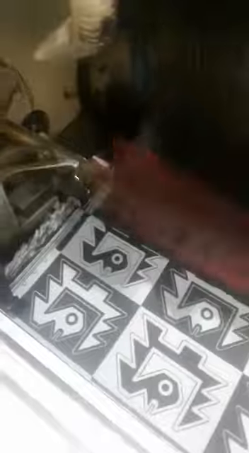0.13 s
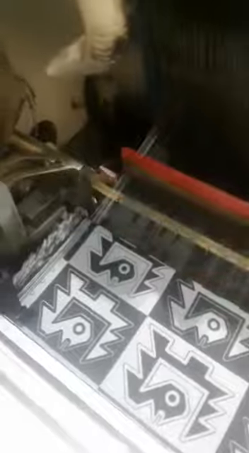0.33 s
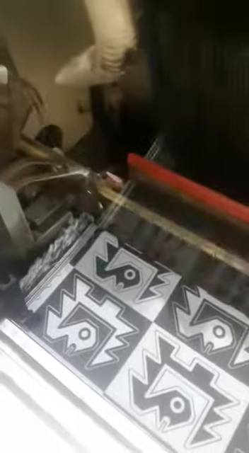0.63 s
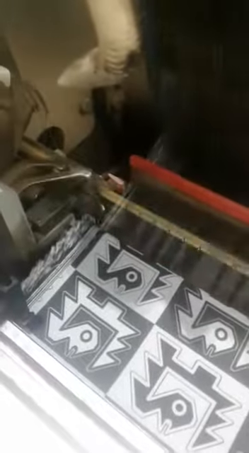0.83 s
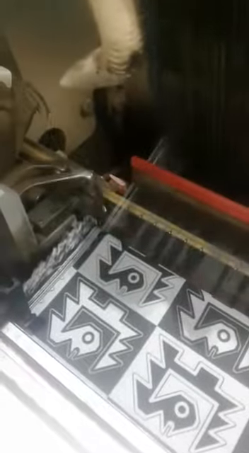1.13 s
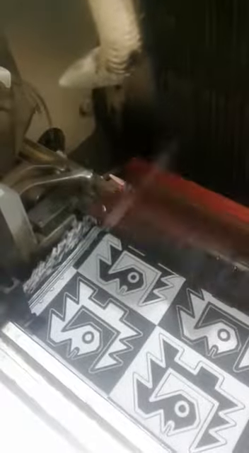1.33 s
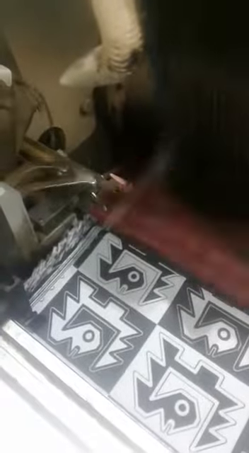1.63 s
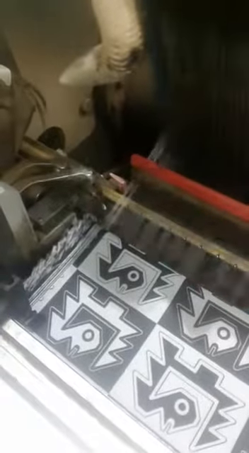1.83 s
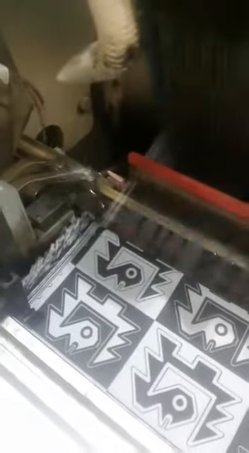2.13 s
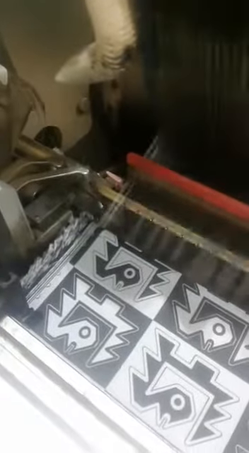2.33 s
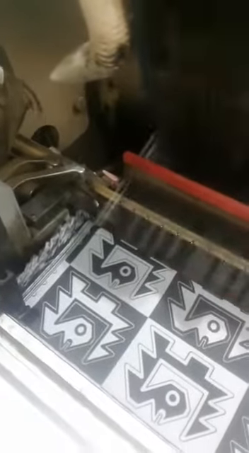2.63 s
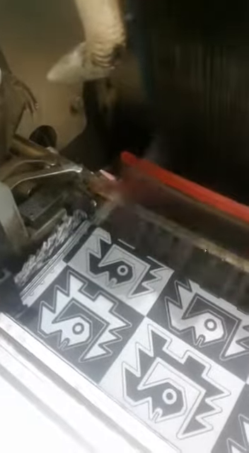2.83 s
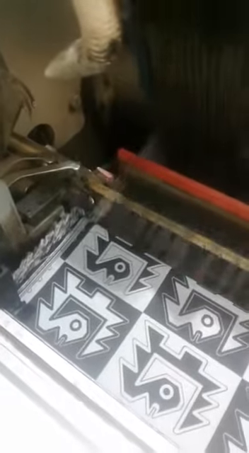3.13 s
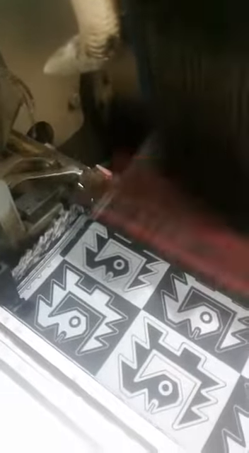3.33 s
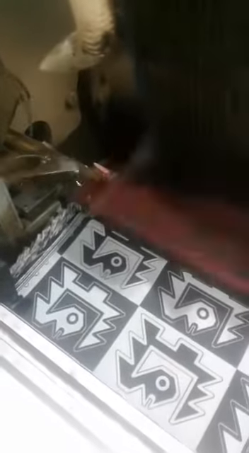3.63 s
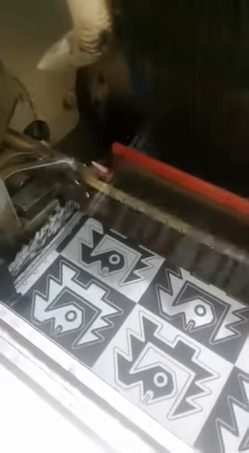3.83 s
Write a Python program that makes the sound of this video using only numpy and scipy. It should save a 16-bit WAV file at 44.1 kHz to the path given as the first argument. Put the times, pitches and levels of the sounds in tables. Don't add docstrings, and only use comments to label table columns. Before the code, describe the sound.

A power loom clatters loudly at about six and a half beats a second in a roaring workshop

```python
import sys
import numpy as np
from scipy import signal
from scipy.fft import rfft, irfft, next_fast_len
from scipy.io import wavfile
from scipy.ndimage import uniform_filter1d, map_coordinates

SR = 44100
rng = np.random.default_rng(int(sys.argv[2]) if len(sys.argv) > 2 else 0)


def rack_gain(trim_db):
    fader = np.asarray(trim_db, float)
    return 10 ** (fader / 20)


def bounce(signal):
    frames = np.transpose(np.atleast_2d(signal))
    limited = np.clip(frames, -1, 1)
    pcm = np.round(limited * 32767).astype(np.int16)
    wavfile.write(sys.argv[1], SR, pcm)


N = 176400
PICK_S, FIRST_S = .15271, .0764

# frequency in Hz, density in dB per Hz.
ROAR = [(30, -42), (70, -18), (170, -8), (240, -7), (400, -4.5), (800, -11.5), (1300, -11.5), (2500, -21)]
# frequency in Hz, width in Hz, level in dB.
HALL_RINGS = [(334, 10, -2), (1080, 56, -4), (3600, 35, -1.5)]
# frequency in Hz, density in dB per Hz.
AIR = [(1760, -21), (3000, -4), (3150, -8.5), (4580, -9), (6750, -8.5), (8650, -3.5), (11300, -29),
       (13600, -20.5), (15700, -19)]
# frequency in Hz, rms level in dB.
WHINE = [(2994, -38), (2840, -47), (50, -55.5)]
# frequency in Hz, density in dB per Hz.
GEARS = [(30, -32), (80, -14), (150, -9), (300, -16), (550, -6), (850, -7), (1400, -10), (2000, -13)]
# start in seconds, frequency in Hz, level in dB, length in seconds.
SQUEAKS = [
    (.495, 13650, -38, .012),
    (2.632, 13650, -40, .014),
]
# time in seconds, peak level in dB.
SNAPS = [(0.608, -26), (0.7546, -27), (0.943, -26.5), (1.06, -25), (1.3708, -25), (1.517, -29.5),
         (1.8297, -25), (1.9774, -27), (2.2872, -25), (2.4404, -23), (2.5925, -27), (2.7462, -24),
         (3.0515, -25), (3.2031, -27.5), (3.5104, -23), (3.6626, -20), (3.8147, -26), (3.967, -29.5)]
# seconds after the pair starts, centre in Hz, level in dB,
# 60 dB decay in seconds.
WIRES = [(.040, 8500, -7.5, .03), (.041, 13000, -35.5, .03), (.064, 11500, -29, .02),
         (.073, 9100, -8, 0.034), (.100, 12500, -37, .04), (.108, 3300, -35, 0.0225),
         (.120, 9130, -22, 0.039), (0.13, 8000, -13, 0.062), (0.132, 11900, -32, 0.081),
         (.166, 8000, -32, .015), (0.193, 8640, -9, 0.044), (.215, 11230, -35, 0.0493),
         (.225, 9200, -10, 0.039), (.238, 13000, -29, .03), (.250, 13500, -33, .03), (.258, 3000, -31, .02),
         (.276, 14000, -26, .02), (.283, 9450, -23, 0.11), (0.286, 11940, -31, 0.063)]
# time in seconds, peak level in dB.
JOLTS = [(0.5152, -15), (0.6559, -16), (0.753, -23), (1.1239, -17), (1.5733, -20.5), (1.7388, -17),
         (2.183, -12), (2.3421, -30.5), (2.7941, -15), (3.3573, -20), (3.4027, -17), (3.6626, -18),
         (3.705, -20)]
# seconds after the turn starts, centre in Hz, level in dB, 60 dB decay in seconds.
SLEY = [
    (-.008, 1540, -14.5, 0.073),
    (.030, 1383, -17, 0.054),
    (.062, 640, -18, .08),
    (.095, 2750, -23, 0.071),
]
# seconds after the pick starts, frequency in Hz, level in dB,
# 60 dB decay in seconds.
PARTS = [(0.0031, 1252, -7.1, 0.07), (0.0052, 1636, -12.4, 0.07), (0.0053, 820, -12.4, 0.11),
         (0.006, 1540, -5.8, 0.04), (0.0075, 618, -7.9, 0.04), (0.0138, 1096, -6.6, 0.07),
         (0.0173, 444, -2.7, 0.04), (0.0189, 576, -11.1, 0.16), (0.022, 324, -6.1, 0.11),
         (0.0299, 210, -12.1, 0.16), (0.037, 1396, -6.6, 0.04), (0.0414, 258, -5.8, 0.07),
         (0.0419, 1300, -9.6, 0.07), (0.0497, 1108, -7.4, 0.16), (0.0583, 642, -4.9, 0.07),
         (0.0614, 1156, -11.6, 0.07), (0.0656, 150, -10.7, 0.07), (0.0704, 1060, -13.9, 0.16),
         (0.0768, 456, -13.0, 0.16), (0.0795, 336, -2.9, 0.11), (0.081, 558, -7.9, 0.04),
         (0.0891, 504, -8.3, 0.11), (0.0944, 150, -9.8, 0.04), (0.0986, 246, -7.4, 0.07),
         (0.1194, 600, -5.6, 0.04), (0.1201, 1096, -3.0, 0.07), (0.126, 384, -8.2, 0.07),
         (0.1391, 1408, -14.0, 0.16), (0.1428, 1348, -9.8, 0.16), (0.144, 1204, -8.6, 0.04)]


def unit(x):
    return x / np.sqrt(np.mean(x ** 2) + 1e-20)


def along(points, hz):
    f, v = np.transpose(points)
    return np.interp(np.log(hz + 1), np.log(f + 1), v) - 24 * np.clip(np.log2(f[0] / (hz + 1)), 0, None)


def octaves_above(points, hz):
    return np.clip(np.log2((hz + 1) / points[-1][0]), 0, None)


def filtered(x, response):
    m = next_fast_len(len(x) + SR // 4)
    return irfft(rfft(x, m) * response(np.fft.rfftfreq(m, 1 / SR)), m)[:len(x)]


def resonance(f, hz, width):
    return 1j * f * width / (hz * hz - f * f + 1j * f * width)


def wobble(rate):
    return map_coordinates(rng.standard_normal(int(N * rate / SR) + 4), [np.arange(N) * rate / SR])


def patchy(depth_db):
    z = signal.stft(rng.standard_normal(N + 512), nperseg=512)[2]
    field = uniform_filter1d(uniform_filter1d(rng.standard_normal(z.shape), 6, 0), 8, 1)
    return signal.istft(z * rack_gain(depth_db * unit(field)), nperseg=512)[1][:N]


def strikes(times, gains):
    at = np.round(np.asarray(times) * SR).astype(int)
    keep = (at >= 0) & (at < N)
    return np.bincount(at[keep], np.asarray(gains)[keep], N)


def ringing(hits, answer):
    return signal.fftconvolve(hits, answer)[:N]


def decay(t, t60):
    return rack_gain(-60 * t / t60)


def picks(step):
    return FIRST_S + PICK_S * np.arange(step - 1, N / SR / PICK_S, step)


def distant_looms():
    def colour(f):
        rings = 1 + sum(rack_gain(db) * resonance(f, hz, width) for hz, width, db in HALL_RINGS)
        return rack_gain(along(ROAR, f) - 10 * octaves_above(ROAR, f)) * rings

    roar = unit(filtered(patchy(depth_db=1.5), colour))
    return rack_gain(-17 + 0.5 * wobble(5.1)) * roar


def far_hiss():
    def colour(f):
        return rack_gain(along(AIR, f) - 12 / (1 + (9800 / (f + 1)) ** 12))

    hiss = unit(filtered(patchy(depth_db=1.5), colour))
    return rack_gain(-29 + 1.18 * wobble(3.01)) * hiss


def motor():
    t, out = np.arange(N) / SR, np.zeros(N)
    for hz, db in WHINE:
        level = np.sqrt(2) * rack_gain(db + 1.2 * wobble(6.02))
        out += level * np.sin(2 * np.pi * hz * t + .6 * wobble(3.3))
    return out


def room(x):
    t = np.arange(SR // 2) / SR
    tail = rng.standard_normal(len(t)) * decay(t, t60=.4) * (t > .012)
    return filtered(ringing(x, tail / np.linalg.norm(tail)), lambda f: 1 / (1 + (f / 8000) ** 6))


def gears():
    size, starts = round(PICK_S * SR), picks(step=1)
    hz = np.fft.rfftfreq(size, 1 / SR)
    colour = rack_gain(along(GEARS, hz) - 37 * octaves_above(GEARS, hz))
    turn = irfft(rfft(rng.standard_normal(size)) * colour, size)
    return rack_gain(-24) * unit(ringing(strikes(starts, np.ones(len(starts))), turn))


def squeaks():
    t, out = np.arange(N) / SR, np.zeros(N)
    regular = [(s + .162, 13600, -46, .008) for s in picks(step=2)]
    for s, hz, db, length in [*SQUEAKS, *regular]:
        swell = np.exp(-((t - s - length / 2) / (length / 2)) ** 4)
        out += rack_gain(db) * swell * np.sin(2 * np.pi * hz * t)
    return out


def cutter():
    t, (s, db) = np.arange(SR // 20) / SR, np.transpose(SNAPS)
    shape = ringing(strikes(s, rack_gain(db + 1)), decay(t, t60=.0181) * (1 - np.exp(-t / .0011)))
    return shape * unit(filtered(rng.standard_normal(N), lambda f: resonance(f, 13600, 3400) ** 2))


def wire_colour(f):
    return rack_gain(along(AIR, f)) * (1 + rack_gain(1) * resonance(f, hz=7865, width=40))


def heald_ticks():
    t, starts, out = np.arange(SR // 8) / SR, picks(step=2), np.zeros(N)
    for s, hz, db, t60 in WIRES:
        gains = rack_gain(db + rng.normal(0, 2, len(starts)))
        shape = ringing(strikes(starts + s, gains), decay(t, t60) * (1 - np.exp(-t / .0013)))
        out += filtered(shape * rng.standard_normal(N),
                        lambda f: resonance(f, hz, .32 * hz) / rack_gain(along(AIR, hz)))
    s, db = np.transpose(JOLTS)
    out += ringing(strikes(s, rack_gain(db + 5.5)), decay(t, t60=.075)) * rng.standard_normal(N)
    return filtered(out, wire_colour)


def heald_rattle():
    t, rate_per_s = np.arange(SR // 8) / SR, 4000
    place, chance, sign = rng.random((int(rate_per_s * N / SR), 3)).T
    times = place * N / SR
    size_db = -3.5 * np.log(chance + 0.011)
    size_db += 4 * np.cos(2 * np.pi * (times - FIRST_S - .1) / PICK_S)
    size_db += 1.5 * np.cos(4 * np.pi * (times - FIRST_S - .055) / PICK_S)
    grains = strikes(times, rack_gain(size_db) * np.sign(sign - .5))
    clumped = grains * rack_gain(1 * wobble(40))
    rattle = ringing(clumped, decay(t, t60=.0066) * rng.standard_normal(len(t)))

    def brighter(f):
        return wire_colour(f) * rack_gain(4 / (1 + (12000 / (f + 1)) ** 12))

    return rack_gain(-32) * unit(filtered(rattle, brighter))


def sley():
    t, starts, out = np.arange(SR // 8) / SR, picks(step=0.99), np.zeros(N)
    for s, hz, db, t60 in SLEY:
        gains = rack_gain(db + rng.normal(0, 2, len(starts)))
        shape = ringing(strikes(starts + s, gains), decay(t, t60) * (1 - np.exp(-t / .0037)))
        out += shape * unit(filtered(rng.standard_normal(N), lambda f: resonance(f, hz, .45 * hz) ** 2))
    return out


def frame_parts():
    t, starts, out = np.arange(SR // 5) / SR, picks(step=1), np.zeros(N)
    for s, hz, db, t60 in PARTS:
        swell = 1 - np.exp(-(t / (.15 * t60)) ** 2)
        ring = np.sin(2 * np.pi * hz * t) * rack_gain(db) * decay(t, t60) * swell
        jitter_s, scatter_db = rng.standard_normal((2, len(starts))) * [[.00003], [1.2]]
        out += ringing(strikes(starts + s + jitter_s, rack_gain(scatter_db)), ring)
    return out


def beat_up():
    t, starts = np.arange(SR // 5) / SR, picks(step=1)
    high_hz, low_hz, glide_s, rise_s = 500, 240, .003, .0035
    turns = low_hz * t + (high_hz - low_hz) * glide_s * (1 - np.exp(-t / glide_s))
    swell = 1 - np.exp(-(t / rise_s) ** 2)
    thump = np.sin(2 * np.pi * turns) * rack_gain(5.5) * decay(t, t60=.038) * swell
    return ringing(strikes(starts + .01034, np.ones(len(starts))), thump)


def scene():
    background = distant_looms() + far_hiss() + motor()
    light = squeaks() + cutter() + heald_ticks() + heald_rattle()
    heavy = sley() + frame_parts() + beat_up()
    answer = room(rack_gain(-22) * heavy + rack_gain(-10) * light)
    return (background + answer + gears() + light + heavy)[None]


def low_pass(x):
    return signal.sosfilt(signal.butter(12, 15990, fs=SR, output="sos"), x)


def record(dry):
    fade_from_s, fade_s = 0.3687, 0.3
    fade = np.clip((np.arange(N) / SR - fade_from_s) / fade_s, 0, 1) ** 0.963
    limited = dry / (1 + np.abs(dry / .95) ** 10) ** (1 / 10)
    mix = filtered(limited[0], lambda f: f < 15720)[None] * fade
    return low_pass(mix)


dry = scene()
out = record(dry)
bounce(out)
```